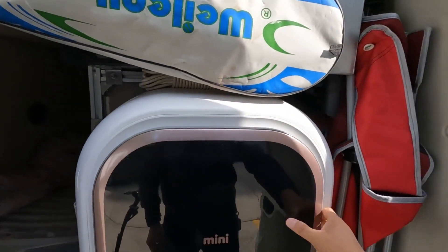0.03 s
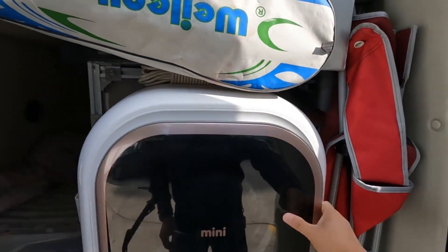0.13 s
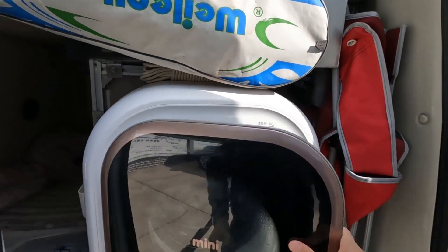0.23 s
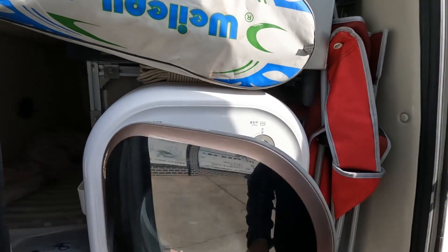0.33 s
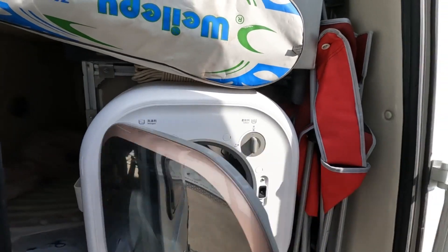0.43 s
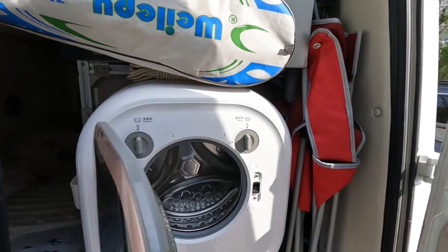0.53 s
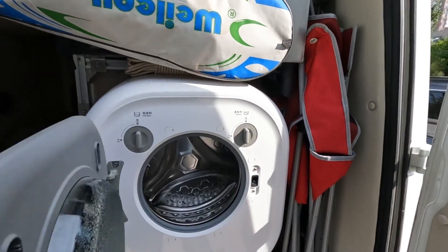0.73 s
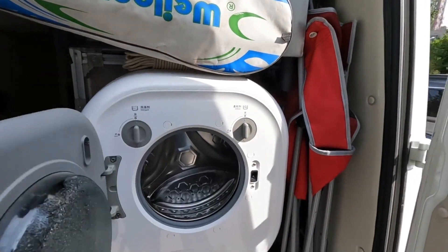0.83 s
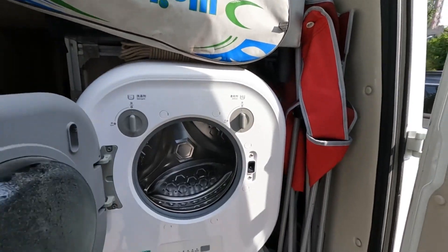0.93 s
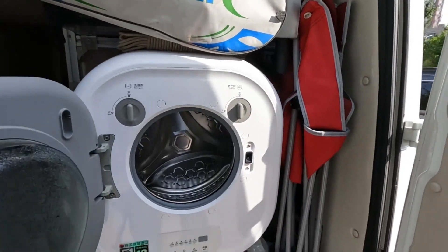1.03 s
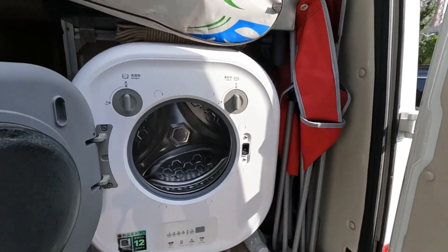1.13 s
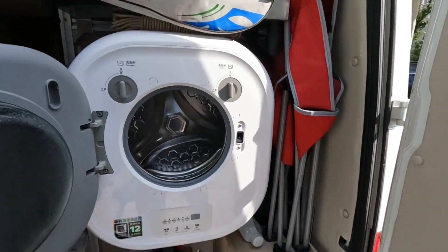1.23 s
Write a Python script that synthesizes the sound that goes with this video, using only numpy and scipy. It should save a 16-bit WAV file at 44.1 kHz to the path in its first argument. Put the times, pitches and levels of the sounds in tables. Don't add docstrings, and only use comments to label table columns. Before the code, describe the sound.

Close up in a van open to the street, a plastic door latch chatters and springs free with a hollow thump, the hinge ticks faintly, then scrapes briefly to its stop, while traffic and an engine hum low.

```python
import sys
import numpy as np
from scipy import signal
from scipy.io import wavfile
from scipy.ndimage import uniform_filter1d

SR = 44100
rng = np.random.default_rng(int(sys.argv[2]) if len(sys.argv) > 2 else 0)


def unload_audio(sound):
    columns = np.transpose(np.atleast_2d(sound))
    steps = np.round(np.clip(columns, -1, 1) * 32767)
    wavfile.write(sys.argv[1], SR, steps.astype(np.int16))


def volts(x):
    e = np.asarray(x, float) / 20
    return 10 ** e


N = 57330

# t/s, street level/dB, engine hum level/dB
TRAFFIC = [(0, 6.5, -37), (.12, 1.5, -39.5), (.17, 2.5, -42), (.45, 2.5, -44), (.62, -1.5, -50),
           (.8, -4.5, -43.5), (.88, -4.5, -42.5), (.97, -1, -44), (1.06, 4, -42.5), (1.2, -1.5, -39),
           (1.3, 2, -42)]


def level(x, db):
    return x * volts(db) / np.sqrt(np.mean(x ** 2))


def ring(x, hz, width_hz):
    r = np.exp(-np.pi * width_hz / SR)
    b = [(1 - r * r) / 2, 0, (r * r - 1) / 2]
    a = [1, -2 * r * np.cos(2 * np.pi * hz / SR), r * r]
    return signal.lfilter(b, a, x)


def ring_twice(x, hz, width_hz):
    return ring(ring(x, hz, width_hz), hz, width_hz)


def highpass(x, hz):
    return signal.sosfilt(signal.butter(2, hz, "high", fs=SR, output="sos"), x)


def walk(rate_hz):
    k = int(SR / rate_hz)
    steps = np.repeat(rng.standard_normal(N // k + 1), k)
    return 1.44 * uniform_filter1d(uniform_filter1d(steps, k), k)[:N]


def body(x, modes):
    impulse = np.eye(1, 4096)[0]
    tap = sum((-1) ** k * volts(db) * ring(impulse, hz, w) for k, (hz, w, db) in enumerate(modes))
    return signal.fftconvolve(x, tap / np.sqrt(np.sum(tap ** 2)))[:N]


def ping(t, start_s, hz, t60_s):
    since = t - start_s
    return (since > 0) * np.sin(2 * np.pi * hz * since) * 1000. ** (-np.abs(since) / t60_s)


def glide(t, s, hz, db):
    fade_s = 0.0075
    outside_s = np.clip(s[0] - t, 0, 9) + np.clip(t - s[-1], 0, 9)
    env = volts(np.interp(t, s, db)) * np.exp(-outside_s / fade_s)
    return np.sqrt(2) * env * np.sin(2 * np.pi * np.cumsum(np.interp(t, s, hz)) / SR)


def street(t):
    # f/Hz, density/dB per Hz
    street_spectrum = [(13, -25), (22, -2), (69, -10.5), (107, -5.5), (130, -15), (195, -18.5),
                       (237, -21.5), (1470, -37.5), (15000, -72.5)]
    f, density_db = np.array(street_spectrum).T
    out = 0
    for hz in 24 * 2 ** np.arange(0, 9.3, 1 / 3):
        mid, side = (ring_twice(rng.standard_normal(N), hz, hz / 3) for _ in range(2))
        db = np.interp(np.log(hz), np.log(f), density_db) + 1.85 * walk(9.67)
        side_share = np.clip(hz / 2150, .04, .6)
        out = out + volts(db) * (mid + side_share * side * np.array([[1], [-1]]))
    s, street_db, _ = np.array(TRAFFIC).T
    return level(out, -40) * volts(np.interp(t, s, street_db))


def engine(t):
    # f/Hz, width/Hz, level/dB
    hum_lines = [(31.38, 3.7, -47.5), (193, 3.5, -60), (410.3, 82, -54), (780, 200, -60), (4530, 1600, -72),
                 (7020, 780, -79.5)]
    hum = 0
    for hz, width_hz, db in hum_lines:
        hum = hum + level(ring_twice(rng.standard_normal(2 * N), hz, width_hz)[N:], db)
    s, _, hum_db = np.array(TRAFFIC).T
    tone_hz = 99.4 * (1 + 0.012 * walk(8.52))
    tone = np.sin(2 * np.pi * np.cumsum(tone_hz) / SR)
    return hum + np.sqrt(2) * volts(np.interp(t, s, hum_db)) * tone


def swing(t):
    centre_s, spread_s = 0.52, 0.14
    noise = rng.standard_normal((2, N)) + 2 * rng.standard_normal(N)
    air = ring_twice(noise, 1490, 530)
    return level(air, -57.5) * np.exp(-((t - centre_s) / spread_s) ** 2)


def floor_sag(t):
    sag = (.355, .475, 105, 55, -28, -33)
    return glide(t, sag[:2], sag[2:4], sag[4:])


def van_bumps(t):
    # t/s, f/Hz, level/dB, T60/s
    knocks = [(0.014, 72, -32, 0.43), (.555, 28.05, -35.5, 2.4), (.2555, 262, -14, 0.19),
              (.3185, 263, -14, 0.15), (0.34, 205, -32, 0.5), (.2635, 213, -20, .1),
              (.244, 170, -26.5, .08), (.43, 195, -34, .4), (.52, 192, -42, .9), (.305, 185, -20, .15)]
    # t/s, f/Hz, level/dB, T60/s
    stop_knocks = [
        (1.0, 24, -24, 0.29),
        (1.003, 73, -40, .1),
        (1.022, 45, -31, .12),
        (1.043, 60, -33, .1),
    ]
    rise_s, stop_s, stop_pan_db = 0.005, .95, -7
    out = 0
    for s, hz, db, t60_s in [*knocks, *stop_knocks]:
        pan_db = stop_pan_db * (s > stop_s) * np.array([[.5], [-.5]])
        rise = np.clip((t - s) / rise_s, 0, 1)
        out = out + volts(db + pan_db) * rise * ping(t, s, hz, t60_s)
    return out


def panel_boom(t):
    # f/Hz, level/dB, T60/s
    panel_modes = [(69, -19, 0.25), (112.8, -13, 0.16), (139.1, -5.5, 0.25), (198, -2, 0.059),
                   (259, -10.5, 0.12), (376.3, -1, 0.11)]
    # t/s, level/dB
    pushes = [(0.215, -47), (0.2229, -21), (0.2405, -51), (0.246, -24), (0.2575, -17), (0.267, -14.5),
              (0.285, -12), (0.2946, -15), (0.3013, -19), (0.3142, -12.5), (0.318, -10.5), (.329, -15),
              (0.339, -20), (1.006, -47), (1.047, -45)]
    push_s = 0.0013
    push = sum(volts(db) * np.exp(-((t - s - push_s) / push_s) ** 2) for s, db in pushes)
    tap = sum(volts(db) * ping(t, 0, hz, t60_s) for hz, db, t60_s in panel_modes)
    return highpass(signal.fftconvolve(push / (push_s * SR), tap)[:N], 85)


def seal_whoop(t):
    # t/s, f/Hz, level/dB
    whoop = [(0.23, 110.8, -17), (0.251, 122.9, -32.5), (0.266, 135.2, -12.5), (0.286, 107.5, -53),
             (0.302, 74.1, -10.5), (0.328, 87.7, -14), (0.351, 127.4, -10.5), (0.377, 145, -27.5),
             (0.413, 141.7, -22.5)]
    return glide(t, *np.array(whoop).T)


def snaps_and_ticks(t):
    # t/s, f/Hz, level/dB, T60/s
    snaps = [(0.257, 990, -13, 0.028), (0.2574, 2640, -18.5, 0.019), (.2590, 848, -17, 0.034),
             (0.3163, 1056, -20, 0.053), (.3170, 695, -19.5, 0.047), (.146, 620, -37.5, 0.044),
             (.213, 1190, -26, .025), (.2265, 1150, -22, .025), (.2570, 1400, -22, 0.022),
             (.2235, 707, -20, .03), (0.2233, 447, -28, 0.062), (.2245, 3780, -22, .025),
             (0.224, 2900, -21.5, 0.021), (0.226, 4240, -27, .02), (.2270, 2270, -27, 0.022),
             (.2450, 1035, -20, 0.032), (.2465, 2100, -24, 0.035), (.2440, 2600, -27, 0.045),
             (0.2947, 2440, -21.5, 0.036), (0.3, 2920, -24.5, .04), (.2950, 3360, -26, 0.022),
             (.3000, 1052, -23.5, .04), (.3125, 1962, -20.5, 0.028), (.3120, 780, -21.5, 0.043),
             (.3140, 1523, -23, 0.04), (0.3161, 2555, -23, 0.028), (.3260, 428, -25, 0.1)]
    # t/s, f/Hz, level/dB, T60/s
    ticks = [(.5135, 4480, -43, 0.016), (.5135, 7330, -45, .02), (.506, 685, -47, 0.038),
             (.7255, 3500, -41.5, 0.027), (.716, 2250, -44, .05), (.722, 5200, -48, .03),
             (1.023, 500, -38, .12), (1.027, 281, -36, .1), (1.030, 180, -40, .08), (1.026, 1130, -44, .12),
             (0.94, 690, -45, .08), (1.058, 310, -42.5, 0.095), (1.047, 400, -43, 0.055)]
    pings = sum(volts(db) * ping(t, s, hz, t60_s) for s, hz, db, t60_s in [*snaps, *ticks])
    side = np.roll(ring(pings, 1250, 700), 11)
    return pings + .6 * side * np.array([[-1], [1]])


def chatter():
    clicks_per_s, scatter_db = 3500, 3
    clicks = rng.standard_normal(N) * (rng.random(N) < clicks_per_s / SR)
    clicks = clicks * volts(scatter_db * np.minimum(rng.exponential(size=N), 2))
    return level(clicks, -4) + 0.5 * rng.standard_normal(N)


def hinge_rubs(t, clicks, slip_gain):
    # start t/s, hold/s, release/s, bright level/dB, dull level/dB
    rubs = [(0.71, 0.025, 0.0047, -51, -57), (0.716, 0.0091, 0.0078, -54, -59),
            (0.894, 0.0096, .004, -53, -48.5), (0.906, 0.037, 0.016, -38, -35.5),
            (0.966, 0.045, 0.035, -48, -45), (1.012, 0.02, 0.035, -47, -51.5),
            (1.073, .05, 0.028, -61.5, -51), (1.137, .12, 0.037, -61, -54.5)]
    # t/s, level/dB
    slips = [(.9092, -23.5), (0.912, -23.5), (0.9153, -21.5), (0.9187, -18.5), (0.9202, -22), (.9216, -24),
             (.9242, -18.5), (0.9255, -22.5), (.9270, -21.5), (0.9289, -21.5), (.9312, -22), (.9324, -20),
             (0.9349, -19.5), (.9388, -23), (0.9451, -25), (.9503, -26.5), (.9533, -27), (0.9603, -27.5),
             (0.7122, -44), (0.7163, -43.5), (.7265, -41.5), (.7290, -40)]
    # f/Hz, width/Hz, level/dB
    rub_bright = [(1960, 450, 5), (2820, 576, 6.5), (3530, 450, 3), (4144, 395, 1), (5400, 850, -4.5),
                  (6380, 460, -2.5), (7200, 820, -5.5), (9440, 2500, -21), (10250, 3200, -21.5),
                  (12800, 3000, -21.5)]
    rub_dull = [(366.6, 44, -2), (699, 50, 1), (1130, 70, 3.5), (1400, 82, 2), (1563, 140, -4),
                (520, 60, -5)]
    attack_s = .003
    rub = np.zeros((2, N))
    for s, hold_s, release_s, *dbs in rubs:
        attack = np.clip((t - s) / attack_s, 0, 1)
        release = np.exp(-np.clip(t - s - hold_s, 0, 9) / release_s)
        rub += volts(dbs)[:, None] * attack * release * clicks
    for s, db in slips:
        rub[:, int(s * SR)] += volts(db + np.array([4.5, 10])) * slip_gain
    return body(rub[0], rub_bright) + body(rub[1], rub_dull)


def latch_hits(t, clicks):
    # t/s, top level/dB, middle level/dB, dull level/dB, chatter decay/s
    hits = [(0.128, -57, -65, -69, 0.0061), (.146, -60, -54, -43.5, 0.014), (.203, -52, -49, -42, 0.0068),
            (0.214, -53, -42, -28, 0.01), (.219, -29.5, -26.5, -48, 0.0047),
            (0.223, -18.5, -21, -17.5, 0.0037), (0.242, -30.5, -24.5, -19, 0.0074),
            (0.2462, -28.5, -23.5, -23, 0.0052), (0.2568, -41, -34.5, -13.5, 0.0031),
            (.265, -52, -41.5, -28.5, 0.014), (0.282, -46, -46, -30, 0.012),
            (0.2933, -23, -22.5, -20.5, 0.0048), (0.2982, -34.5, -23, -19, 0.0071),
            (0.3137, -31, -25, -16, 0.0057), (0.318, -39, -37, -26, 0.0028), (0.33, -55, -51, -30, 0.014),
            (0.34, -69, -51, -36, 0.014), (0.505, -64, -57, -48, 0.0022), (0.5137, -48, -51, -70, 0.0075),
            (0.959, -40, -41, -38, 0.0011), (1.049, -54.5, -71, -39, 0.0083),
            (1.068, -48, -50, -54, 0.0016), (1.183, -66, -69, -44, 0.0066)]
    # f/Hz, width/Hz, level/dB
    top_modes = [(4240, 620, -5.5), (4760, 225, 7), (5260, 660, 1.5), (7160, 780, 3), (7870, 840, -1.5),
                 (8700, 1340, -8), (9940, 1100, -14), (12350, 1700, -13.5)]
    middle_modes = [(2150, 174, 0.5), (2604, 176, 1.5), (2985, 245, 2), (3410, 550, -2.5),
                    (3865, 270, -1.5)]
    dull_modes = [(457, 24, 2.5), (695, 99, -1.5), (885, 75, 1), (990, 43, -0.5), (1060, 81, -1.5),
                  (1280, 135, -5), (1443, 77, -6.5), (1730, 180, -10), (352, 103, -1)]
    hit = np.zeros((3, N))
    for s, *dbs, decay_s in hits:
        env = (t >= s) * np.exp(-np.abs(t - s) / decay_s) * clicks
        env[int(s * SR) + 1] += volts(10)
        hit += volts(dbs)[:, None] * env
    return sum(body(x, modes) for x, modes in zip(hit, [top_modes, middle_modes, dull_modes]))


def van_tail(x):
    k = np.arange(SR // 3) / SR
    noise = rng.standard_normal(len(k)) * 1000. ** (-k / 0.19)
    return signal.fftconvolve(x, level(noise, -15.5) / np.sqrt(len(k)))[:N]


def latch_and_hinge(t):
    clicks = chatter()
    other_clicks = chatter() + 0.2 * clicks
    near = latch_hits(t, clicks) + hinge_rubs(t, clicks, 0.86)
    other = latch_hits(t, other_clicks) + hinge_rubs(t, other_clicks, 0.52)
    side = volts(-10) * highpass(np.roll(other, 9) + 0.4 * np.gradient(other), 874)
    door = near + van_tail(near) + np.array([[-1], [1]]) * (side + .5 * van_tail(near))
    stop_pan_db = 2.5 * np.exp(-((t - 1.03) / 0.19) ** 2)
    return door * volts(stop_pan_db / 2 * np.array([[1], [-1]]))


def scene():
    t = np.arange(N) / SR
    outside = street(t) + engine(t)
    panel = floor_sag(t) + van_bumps(t) + panel_boom(t) + seal_whoop(t) + snaps_and_ticks(t)
    panel = panel * volts(np.array([[-.25], [.25]]))
    return outside + swing(t) + panel + latch_and_hinge(t)


def low_pass(x):
    return signal.sosfilt(signal.butter(12, 15530, fs=SR, output="sos"), x)


def record(dry):
    mic = signal.sosfilt(signal.butter(4, 11350, fs=SR, output="sos"), dry)
    mix = signal.sosfilt(signal.ellip(8, .2, 70, 15500, fs=SR, output="sos"), mic)
    return low_pass(mix)


dry = scene()
out = record(dry)
unload_audio(out)
```